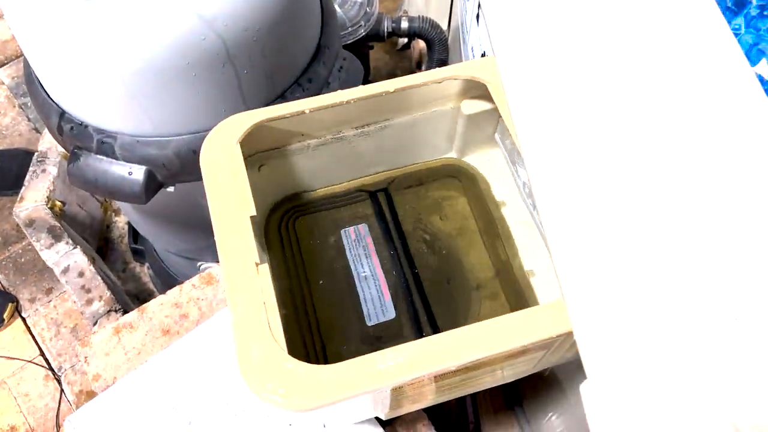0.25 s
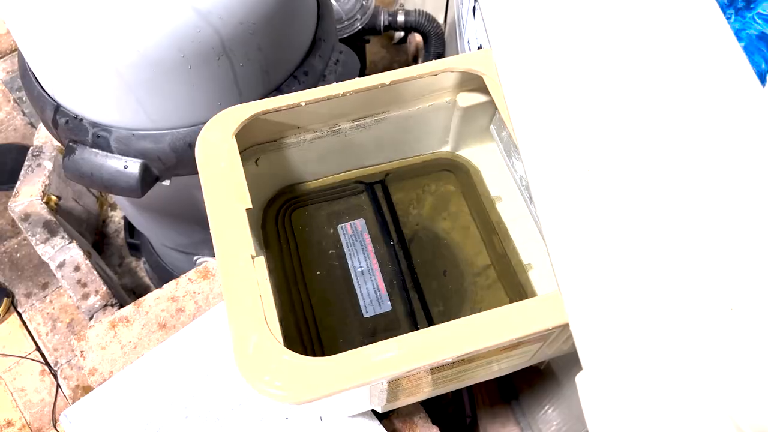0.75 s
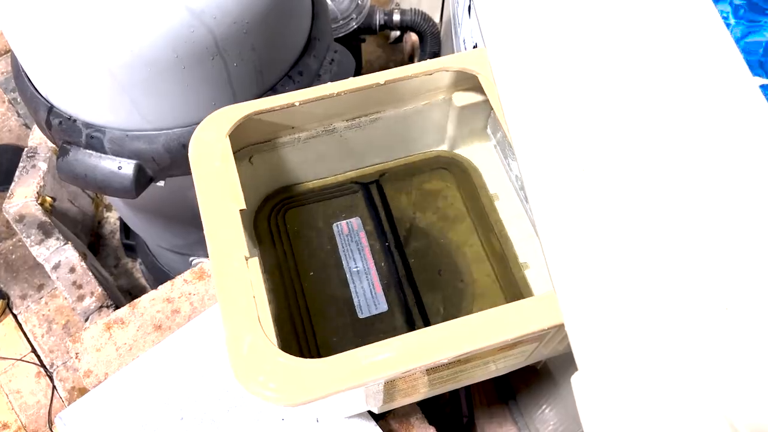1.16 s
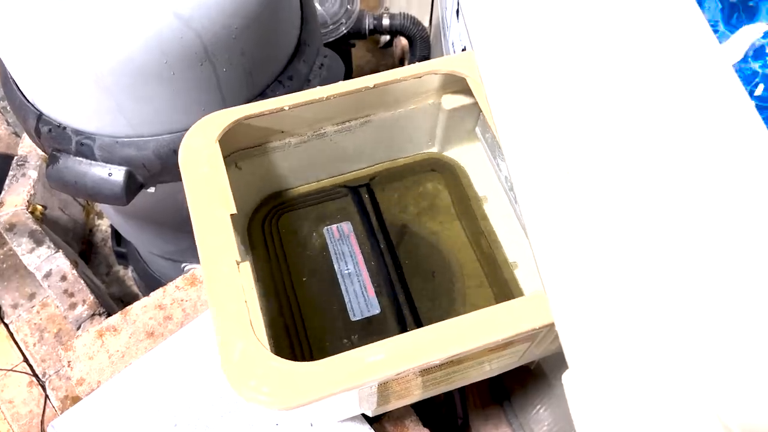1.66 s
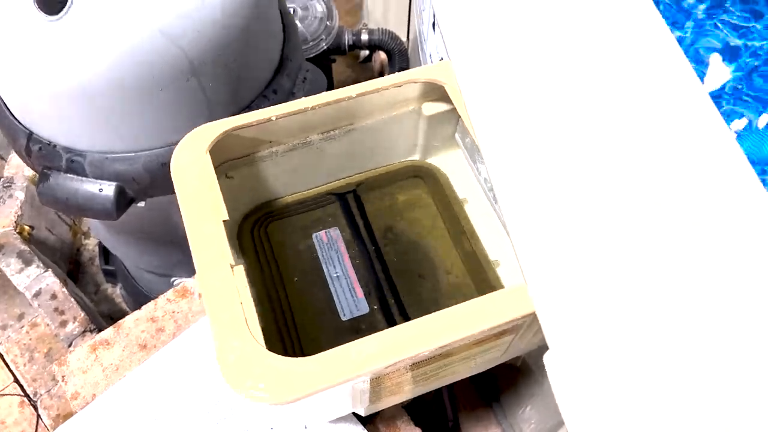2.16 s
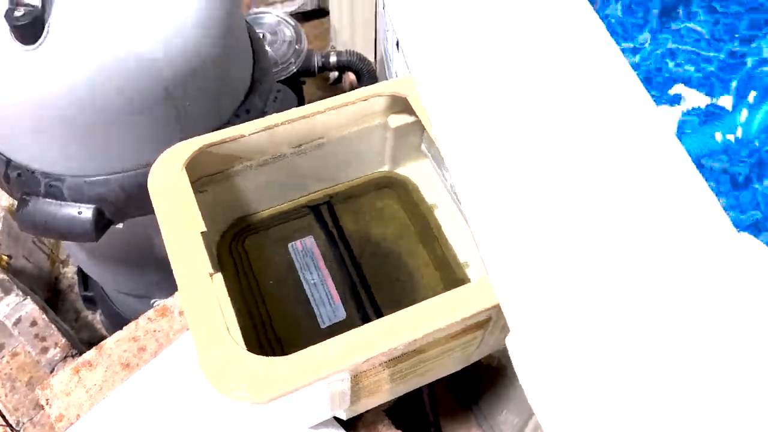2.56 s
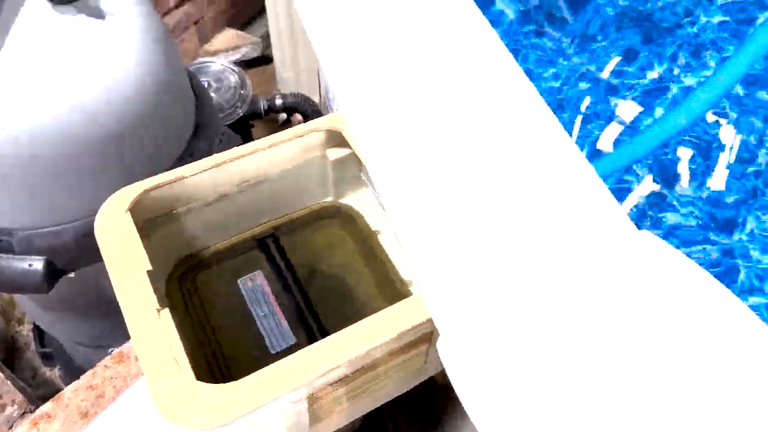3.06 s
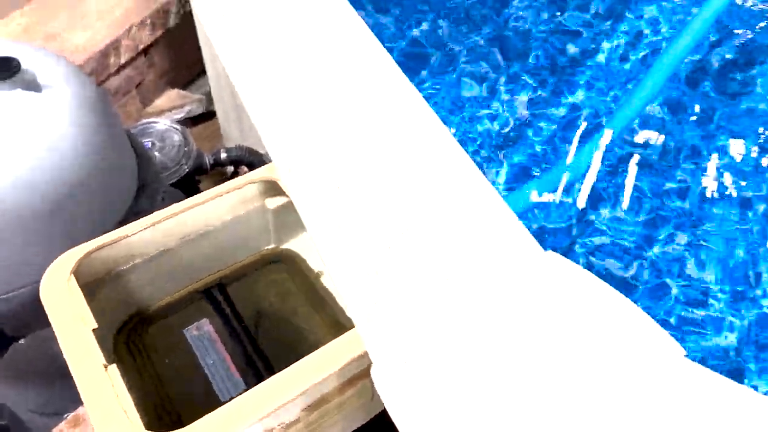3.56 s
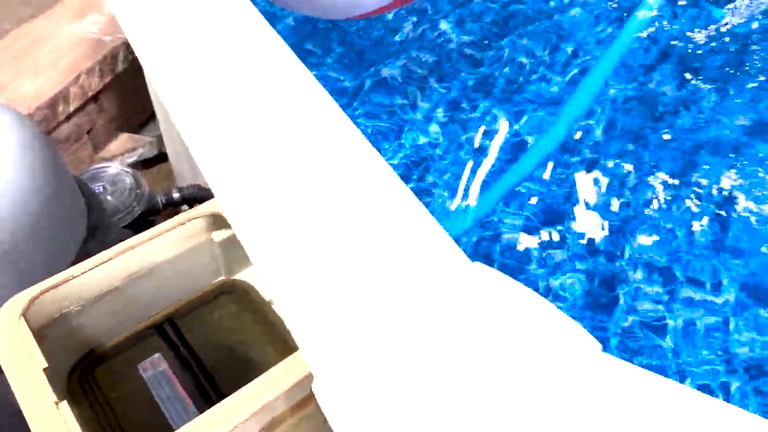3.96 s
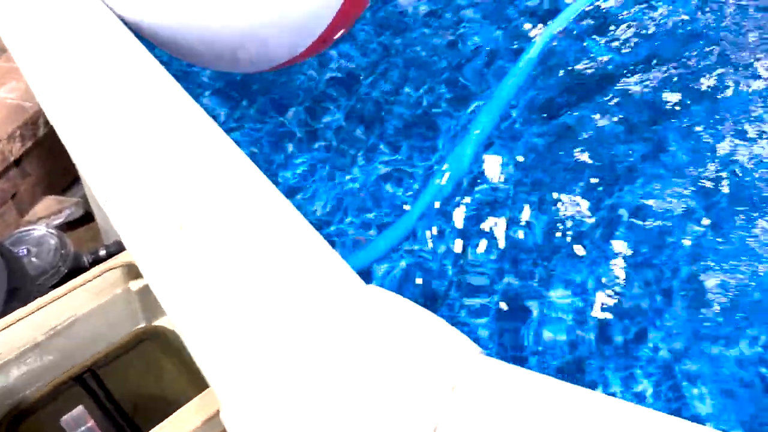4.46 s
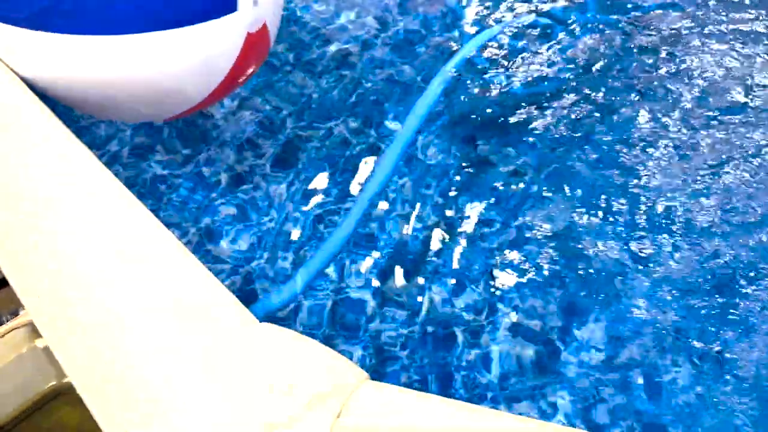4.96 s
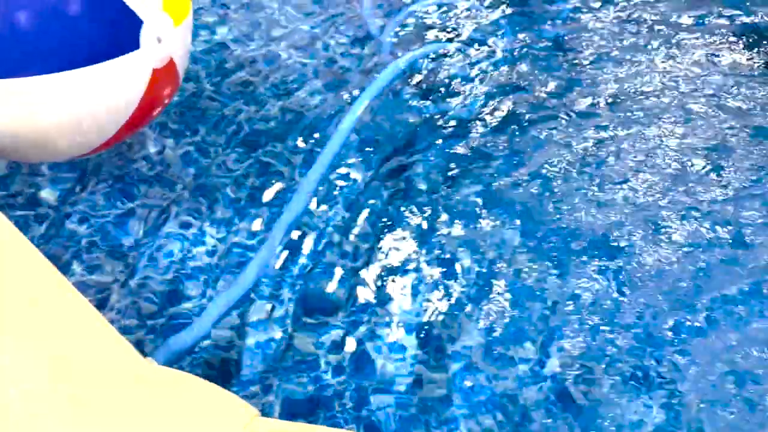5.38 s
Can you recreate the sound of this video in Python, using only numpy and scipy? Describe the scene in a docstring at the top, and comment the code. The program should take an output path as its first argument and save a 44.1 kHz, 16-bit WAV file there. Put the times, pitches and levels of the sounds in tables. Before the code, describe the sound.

A pool pump runs outdoors with a deep, pulsing hum and rumble, picked up by a nearby hand-held phone. Over it lie an even rush of circulating water, a light gurgle and scattered bubble pops. A short cluster of fine spray ticks arrives around the middle. Afterward the motor gets a little softer while the water holds steady, and the plops become more frequent.

```python
"""Poolside, a hand-held phone close to a pump and its open filter box. From the start the induction
motor's mains hum throbs against twice the rate of its slipping shaft, impeller vanes sing and water
rushes through pipes and housing. Bubbles pop throughout; spray fizzes in bursts, most just after 3 s.
Then the phone turns toward the pool, the pump eases off a few dB, and the pops crowd in at the end."""
import sys
import numpy as np
from scipy import signal
from scipy.fft import rfft, irfft, next_fast_len
from scipy.io import wavfile
from scipy.ndimage import uniform_filter1d

SR = 44100
rng = np.random.default_rng(int(sys.argv[2]) if len(sys.argv) > 2 else 0)


def int16_out(signal):
    """Quantize to a 16-bit WAV file."""
    q = np.round(np.clip(np.atleast_2d(signal).T, -1, 1) * 32767)
    wavfile.write(sys.argv[1], SR, q.astype(np.int16))


N = 247797
TIME = np.arange(N) / SR
SIZE = next_fast_len(N)
FREQ = np.maximum(np.arange(SIZE // 2 + 1) * SR / SIZE, 1)


def undb(db):
    """dB to gain."""
    return 10 ** (np.asarray(db) / 20)


def curve(table, column):
    """A table column at every frequency, straight on a log axis."""
    table = np.array(table)
    return np.interp(np.log(FREQ), np.log(table[:, 0]), table[:, column])


def wander(rate_hz):
    """Smooth random drift with a spread near 1."""
    hold = int(SR / rate_hz)
    steps = np.repeat(rng.standard_normal(int(N * 100 / SR)), hold)[:N]
    return 1.3 * uniform_filter1d(uniform_filter1d(steps, hold), hold)


# The phone's two microphones. Each row: frequency in Hz, right lag in radians, left minus right in dB.
MIC_BALANCE = [(30, 0.05, -0.45), (130, .17, -0.41), (300, 0.49, 1.09), (500, 0.7, 3.5), (900, .5, 5),
               (1580, 0.02, -3.5), (2150, .2, 0), (3000, 0.77, 0.86), (4500, 0.25, 0), (6500, .3, 0),
               (8500, 0, 0)]
# Bands where the stereo image shifts; near 11 kHz left and right are alike but opposite in phase.
# Each row: centre in Hz, width in Hz, lag step in half cycles, likeness lost (gained if negative).
STEREO_BANDS = [(30, 25, 0.0012, .2), (600, 230, 0.004, 0.14), (1182.6, 312, -0.9975, 0.64),
                (1793, 257, -0.9955, 0.47), (5000, 2300, 0.0009, .12), (7156, 290, 1, .05),
                (7837, 220, 1, .08), (9686, 560, -1, .25), (11200, 500, .001, -.02), (12677, 690, -1, .15),
                (14500, 2000, .001, .12)]
def microphones(direct, scattered=0):
    """Both microphones hear direct sound with a lag and tilt; scattered sound reaches them unalike."""
    lag, likeness = curve(MIC_BALANCE, 1), .996
    for hz, width, half_cycles, lost in STEREO_BANDS:
        swing = np.tanh((FREQ - hz) / width)
        lag += np.pi / 2 * half_cycles * (1 + swing)
        likeness -= lost * (1 - swing ** 2)
    likeness = np.clip(likeness, 0, 1)
    mid = rfft(direct, SIZE) * (np.sqrt((1 + likeness) / 2) if np.ndim(scattered) else 1)
    side = rfft(scattered + np.zeros(N), SIZE) * np.sqrt((1 - likeness) / 2)
    tilt = undb(curve(MIC_BALANCE, 2) / 2) * np.exp(.5j * lag)
    return irfft([(mid + side) * tilt, (mid - side) / tilt], SIZE)[:, :N]


# The phone's aim. Each row: time in seconds, share of the turn from pump (0) to pool (1).
AIM = [(0, 0.16), (1.2, 0.04), (3, 0.22), (4.5, 0.93), (5.62, 0.94)]
def off_axis(loss_db, unity_share=.283):
    """Gain of a source that loses loss_db over a whole turn from pump to pool."""
    return undb(loss_db * (unity_share - np.interp(TIME, *np.transpose(AIM))))


def yard(sound, wet_db=-5.5, t60_s=.13, build_s=.024):
    """The nearby box, wall and paving return a short scatter of echoes."""
    t = np.arange(SR // 5) / SR
    echo = rng.standard_normal(len(t)) * undb(-60 * t / t60_s) * np.clip(t / build_s, 0, 1)
    echo *= undb(wet_db) / np.sqrt(np.sum(echo ** 2))
    return sound + signal.fftconvolve(sound, echo)[:N]


def turbulence(spectrum, swell_db, flicker_db, flicker_hz):
    """Water noise at the microphones, in half-octave bands that swell together and flicker alone."""
    low_hz, high_hz = spectrum[0][0], spectrum[-1][0]
    noise = rfft(rng.standard_normal((2, N)), SIZE) * undb(curve(spectrum, 1)) * np.sqrt(SR / 2)
    noise[:, (FREQ < low_hz) | (FREQ > high_hz)] = 0
    half_octaves = 2 * np.log2(FREQ / low_hz)
    swell, out = swell_db * wander(22), 0
    for band in range(int(2 * np.log2(high_hz / low_hz)) + 2):
        share = np.cos(np.pi / 2 * np.clip(half_octaves - band, -1, 1)) ** 2
        db = swell + flicker_db * wander(flicker_hz)
        db -= uniform_filter1d(db, SR // 4)  # the flow stays even beyond a quarter second
        out += irfft(noise * share, SIZE)[:, :N] * undb(db)
    return microphones(*out)


# Faint hiss near the filter box. Each row: frequency in Hz, noise density in dB per Hz.
SPRAY_SPECTRUM = [(7500, -115), (9000, -104), (10000, -98), (11700, -100.5), (12300, -96.5), (16500, -99)]
def spray_hiss():
    """Fine spray hisses steadily in the high treble."""
    return off_axis(3) * turbulence(SPRAY_SPECTRUM, swell_db=1.1, flicker_db=1.1, flicker_hz=24)


# The pipework beside the pump. Each row: frequency in Hz, noise density in dB per Hz.
PIPE_SPECTRUM = [(500, -95.5), (800, -85.5), (1100, -86), (1400, -83.5), (1600, -79.5), (2200, -84.5),
                 (3300, -87), (4000, -91.5), (7000, -93), (8500, -98), (10000, -104), (12000, -115)]
def pipe_rush():
    """Water rushes through the pipes, barely fading as the phone turns."""
    return off_axis(1.01) * turbulence(PIPE_SPECTRUM, swell_db=.8, flicker_db=.9, flicker_hz=24)


# Sharp ticks of spray, close and dry. Each row: start in seconds, level in dB.
SPRAY_TICKS = [(1.4067, -39), (1.4855, -43), (2.5287, -45), (3.0704, -41), (3.2435, -34), (3.2745, -35.5),
               (3.3108, -39), (3.333, -38), (3.5773, -38), (5.4011, -46), (5.5167, -34)]
# Softer puffs. Each row: start in seconds, level in dB, seconds to fall 60 dB.
SPRAY_PUFFS = [(1.407, -45, 0.4), (1.488, -50, .3), (3.075, -51, 0.3), (3.58, -52, .2), (4.12, -52, .4),
               (5.52, -51, .2)]
def spray_fizz(tick_t60_s=.014, grain_db=2.6):
    """Bursts of spray die away as grainy, high-passed crackle."""
    out, t = 0, np.arange(SR // 2) / SR
    ticks = [(start, db, tick_t60_s) for start, db in SPRAY_TICKS]
    for bursts, low_hz, rise_s in (ticks, 10500, .0004), (SPRAY_PUFFS, 12000, .004):
        envelope = np.zeros(N + SR)
        for start, db, t60 in bursts:
            envelope[int(start * SR):][:len(t)] += undb(db - 60 * t / t60) * (1 - np.exp(-t / rise_s))
        noise = rng.standard_normal(N)
        grain = undb(grain_db * rng.standard_normal(N // 40 + 1).repeat(40)[:N])
        highpass = signal.butter(6, low_hz, "high", fs=SR, output="sos")
        out += signal.sosfilt(highpass, envelope[:N] * noise * grain)
    return out


def trickle(per_s, low_hz, high_hz, floor_db, spread_db, cycles):
    """Bubble rows for a steady, faint trickle of random pops."""
    for when, pitch, size in rng.random((int(per_s * N / SR), 3)):
        hz = low_hz * (high_hz / low_hz) ** pitch
        yield when * N / SR, floor_db + spread_db * size ** 2, hz, cycles, .02


def spatter(big_bubbles, count=30, span_s=.04):
    """Rows for the small bubbles of nearby pitch that each big one throws just after it."""
    for start, db, hz, cycles, glide in big_bubbles:
        db += 2 * min(np.log2(hz / 4000), 0)  # low pops throw less
        octaves = min(1.6 / cycles, .3)
        for late, faint, pitch in rng.random((count, 3)):
            small_db = db - 20 * (1 + late * faint)
            small_hz = hz * 2 ** (octaves * (2 * pitch - 1))
            yield start + .003 + span_s * late, small_db, small_hz, .7 * cycles, glide


# Distinct pops near the phone. Each row: start in seconds, peak in dB, pitch in Hz,
# main ring in cycles, glide as a share of the pitch.
BIG_BUBBLES = [(.2075, -29, 610, 2.1, .01), (.565, -41, 1300, 8, .01), (.876, -43, 7500, 3, .01),
               (1.139, -40, 1720, 6, .01), (1.591, -40, 1810, 6, .01), (2.253, -40, 1710, 6, .01),
               (2.351, -40, 2150, 6, .01), (2.9687, -37, 2120, 5.4, .01), (3.2281, -37, 2060, 3.6, .01),
               (3.2435, -36.5, 2890, 3.5, .04), (3.2762, -24, 5800, 5.5, .01), (4.112, -39, 8300, 4.4, .01),
               (4.2193, -36, 1212, 13, .01), (4.29, -40, 5500, 3.6, .01), (4.519, -38.5, 479, 4.7, .01),
               (4.541, -40.5, 5610, 3.53, .01), (4.56, -44, 900, 5, .01), (4.6, -44, 1100, 5, .01),
               (4.768, -43, 4900, 5, .01), (4.8065, -35.5, 2080, 13, -.03), (4.814, -42, 3900, 10, .01),
               (4.851, -39, 7000, 5.4, .01), (4.9856, -30, 1632, 15, .01), (5.019, -41, 1700, 8, .01),
               (5.155, -41, 1350, 7, .01), (5.242, -41, 4050, 6, .01), (5.2945, -29, 540, 2.5, .01),
               (5.32, -40, 660, 6, .01), (5.3273, -39, 4200, 6, -.02), (5.329, -40, 4600, 8, .01),
               (5.333, -39, 3750, 14, .01), (5.345, -43, 3750, 14, .01), (5.355, -41, 3900, 9, .01),
               (5.388, -41, 1750, 6, .03), (5.402, -43, 1010, 6, .01), (5.4201, -31.5, 4500, 12, .02),
               (5.4207, -41, 2900, 3, .01), (5.4594, -38, 3200, 5.7, .03), (5.5742, -39.5, 1225, 10.4, .01),
               (5.6094, -36.5, 3000, 6, .08)]
def bubbles():
    """Each bubble, big or small, swells and rings out briefly, gliding in pitch."""
    gurgle = trickle(110, 1100, 3200, floor_db=-52, spread_db=11, cycles=4.99)
    droplets = trickle(30, 4500, 14000, floor_db=-57, spread_db=13, cycles=3.5)
    out = np.zeros(N + SR)
    for start, db, hz, cycles, glide in [*gurgle, *droplets, *BIG_BUBBLES, *spatter(BIG_BUBBLES)]:
        t = np.arange(int(4 * SR * cycles / hz)) / SR
        age = 4 * t * hz / cycles  # 1 at the peak
        envelope = undb(db) * age * np.exp(1 - age)
        bend = 1 + glide * np.minimum(age - 2, 2)
        out[int(start * SR):][:len(t)] += envelope * np.sin(2 * np.pi * hz * t * bend)
    return out[:N]


# Each row: centre of a dip in seconds, level change in dB, half width in seconds.
DRONE_DIPS = [(.27, -2, .02), (.61, -3, .015), (.76, -3, .025), (.802, -12, .016), (1.14, -2, .02),
              (1.245, -3, .02), (1.53, -2.5, .02), (1.7, -4, .02), (2.06, -2, .02), (2.13, -2, .015),
              (2.2, -3, .02), (2.645, -6, .022), (2.95, -2, .04), (3.47, -2.5, .03), (3.79, -2, .02),
              (3.935, -4, .03), (4.37, -4, .02), (4.43, -5, .02), (4.69, -3, .025), (4.83, -3, .025),
              (5.28, -4.5, .04)]
def dips_db():
    """Brief, irregular dips in the level of the low drone."""
    return sum(db * np.exp(-((TIME - at) / width) ** 2) for at, db, width in DRONE_DIPS)


# The pump housing at close range. Each row: frequency in Hz, noise density in dB per Hz.
HOUSING_SPECTRUM = [(20, -96), (33, -84.5), (42, -89.5), (60, -75.5), (80, -70), (100, -60), (108, -59),
                    (114, -59), (124, -64.5), (140, -71.5), (170, -77), (240, -77), (320, -73.5),
                    (420, -76.5), (700, -79), (800, -92)]
def housing_rumble():
    """Turbulence shakes the housing, which booms near the hum's pitch."""
    boom = turbulence(HOUSING_SPECTRUM, swell_db=.5, flicker_db=.9, flicker_hz=9)
    return off_axis(3.5) * undb(.4 * dips_db()) * boom


def pump_tones(multiples, levels_db, waver_db, waver_hz, shaft_hz=58.855, hum_hz=119.94, crest_s=.091):
    """Sums of shaft and hum multiples; close neighbours align at crest_s, so they throb together."""
    phases, out = rng.uniform(0, 2 * np.pi, 64), 0
    for (shaft, hum), db in zip(multiples, levels_db):
        hz = shaft * shaft_hz + hum * hum_hz
        angle = 2 * np.pi * hz * (TIME - crest_s) + phases[shaft + 2 * hum]
        out += np.sqrt(2) * undb(db + waver_db * wander(waver_hz)) * np.cos(angle)
    return out


# The impeller inside the pump. Each row: shaft multiple, hum multiple. Then each tone's base level in dB.
VANE_TONES = [(3, 0), (5, 0), (3, 1), (6, 0), (7, 0), (5, 1), (8, 0), (10, 0), (12, 0), (13, 0), (18, 0),
              (24, 0), (26, 0), (36, 0), (36, 1), (42, 0)]
VANE_LEVELS = [-71, -62, -69.5, -50.5, -58.5, -68, -73.5, -74, -61, -69, -71, -69.5, -64.5, -79, -74.5, -77]
def impeller_whine():
    """The six-vane impeller sings in wavering tones, loudest at six times the shaft rate."""
    return off_axis(5.5) * pump_tones(VANE_TONES, VANE_LEVELS, waver_db=2.3, waver_hz=14)


# The motor, up front. Each row: shaft multiple, hum multiple. Then each tone's base level in dB.
MOTOR_TONES = [(2, 0), (0, 1), (4, -1), (-2, 2), (0, 2), (2, 1), (4, 0), (0, 3)]
MOTOR_LEVELS = [-42, -28.3, -53.5, -59.5, -57.5, -64.5, -64, -66.5]
def motor_hum():
    """Mains hum beats with twice the slipping shaft's rate, a little over two throbs a second."""
    hum = pump_tones(MOTOR_TONES, MOTOR_LEVELS, waver_db=.25, waver_hz=4.08)
    return off_axis(2.5) * undb(dips_db()) * hum


def scene():
    """Pump, water and bubbles in stereo, from where the phone is held."""
    pump = motor_hum() + impeller_whine()
    pops = bubbles()
    water = housing_rumble() + pipe_rush() + spray_hiss()
    return water + microphones(pump + yard(pops) + spray_fizz())


def record(dry, top_hz=15780):
    """The phone cuts the highest treble steeply."""
    return signal.sosfilt(signal.ellip(12, .2, 80, top_hz, fs=SR, output="sos"), dry)


dry = scene()
out = record(dry)
int16_out(out)
```